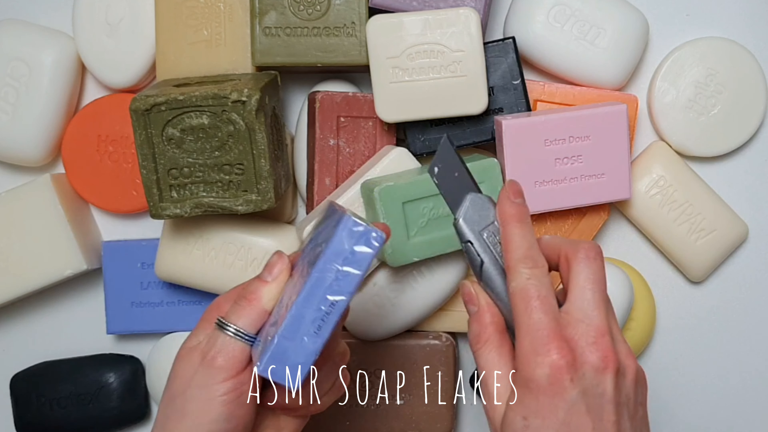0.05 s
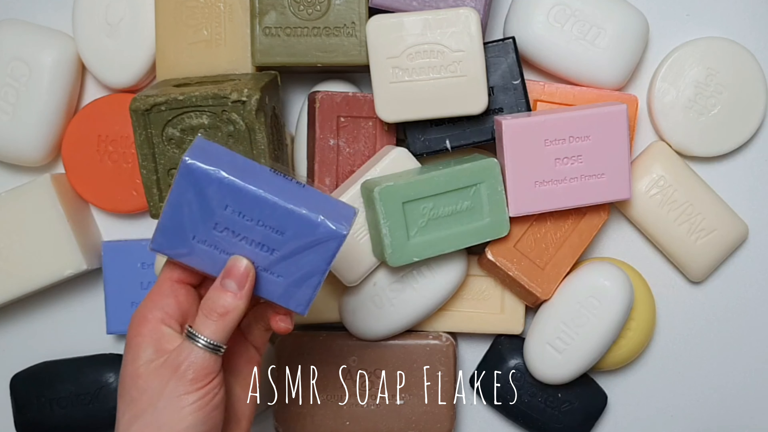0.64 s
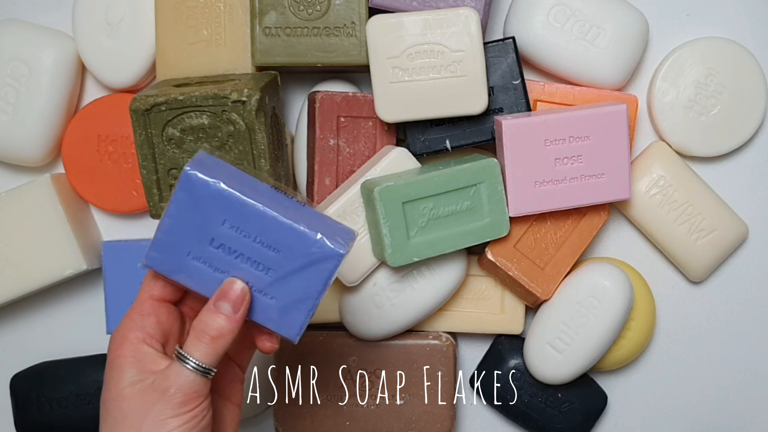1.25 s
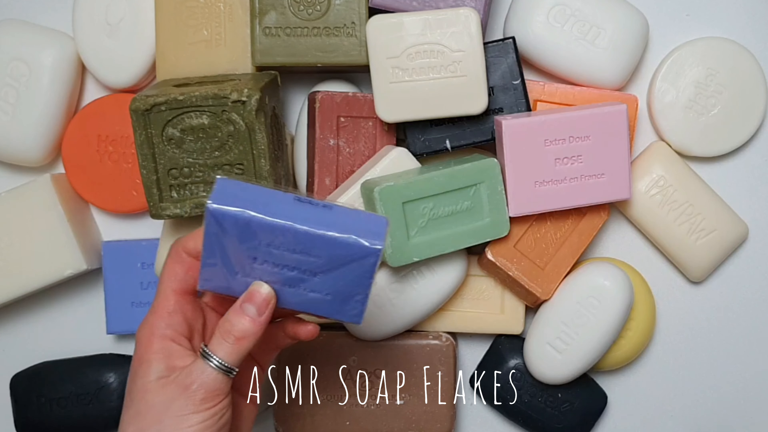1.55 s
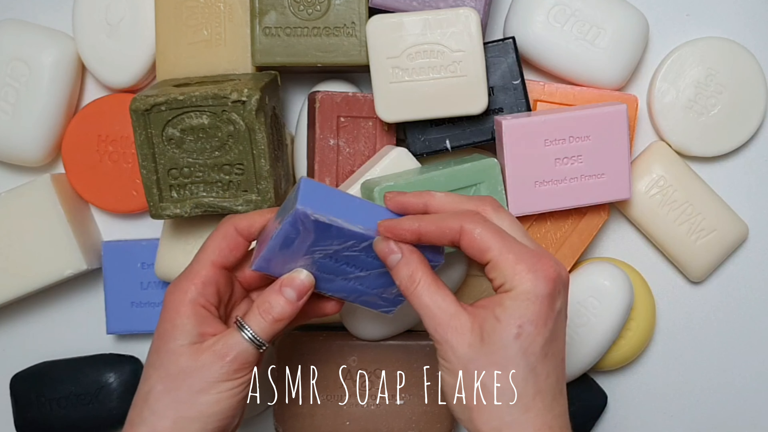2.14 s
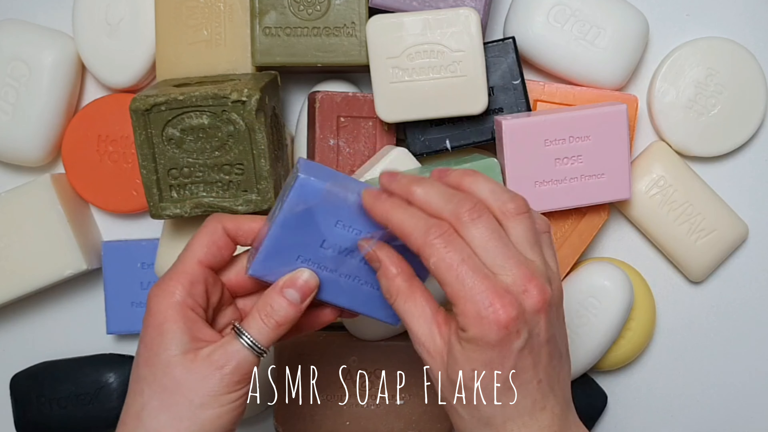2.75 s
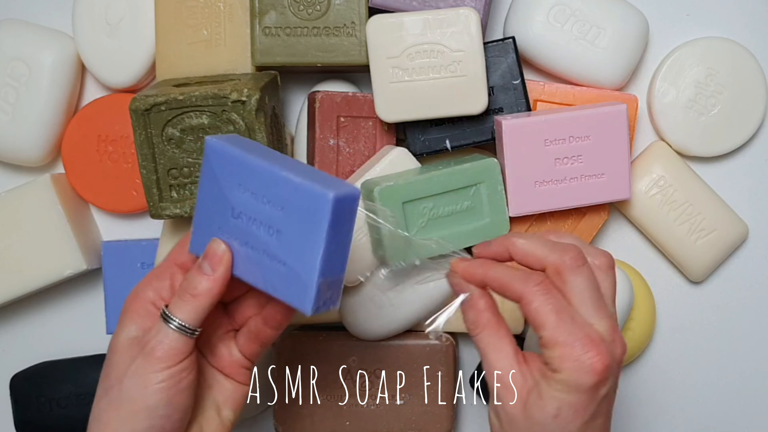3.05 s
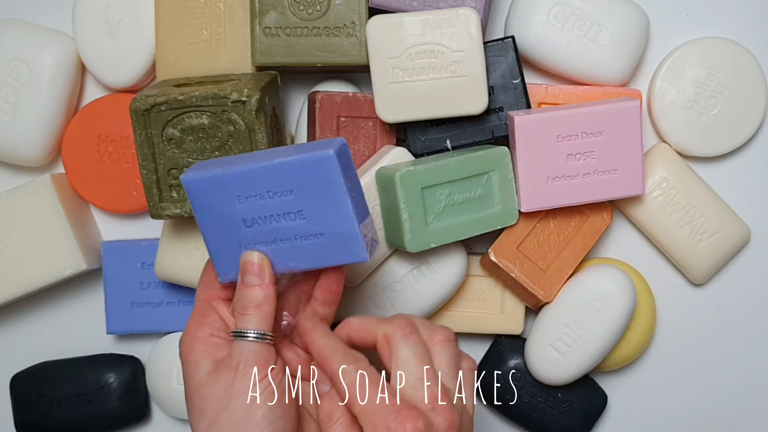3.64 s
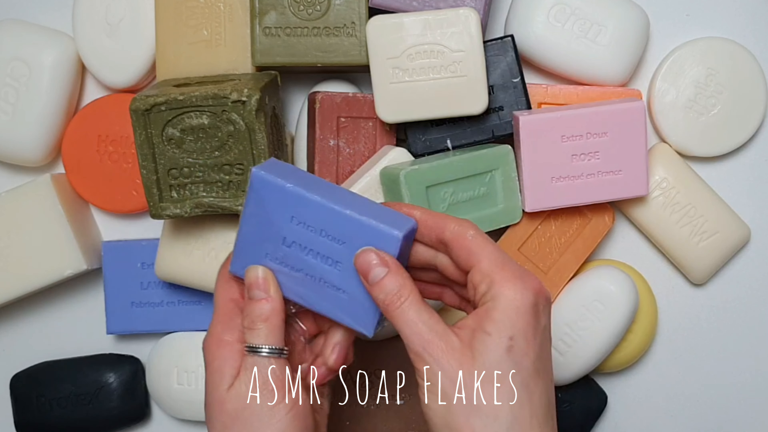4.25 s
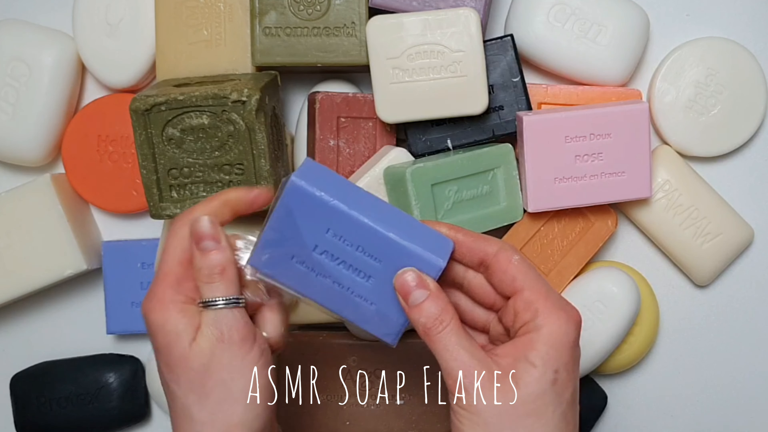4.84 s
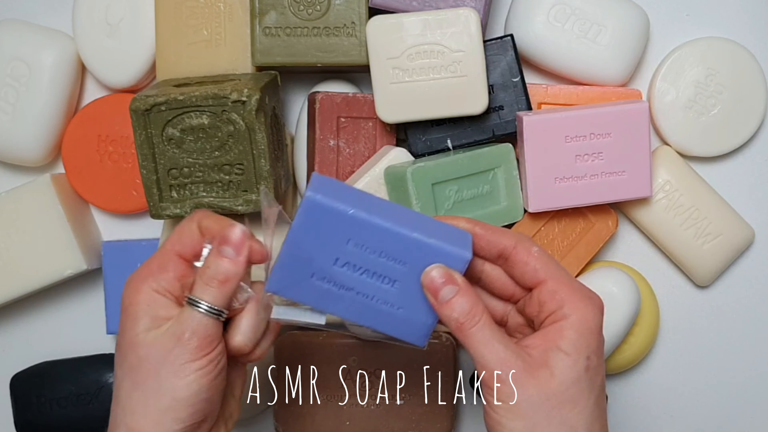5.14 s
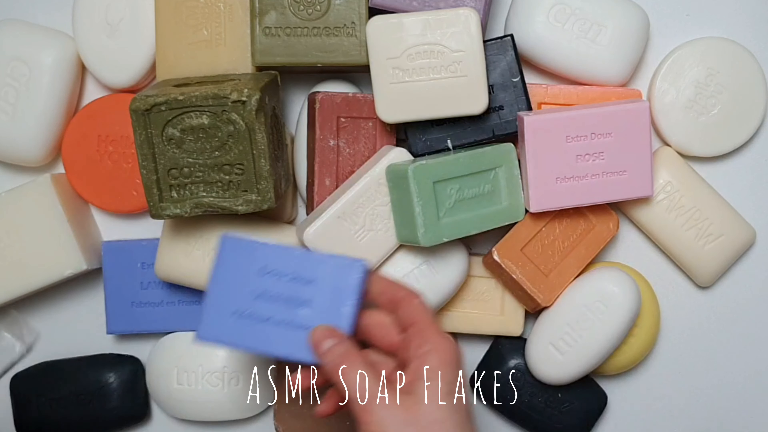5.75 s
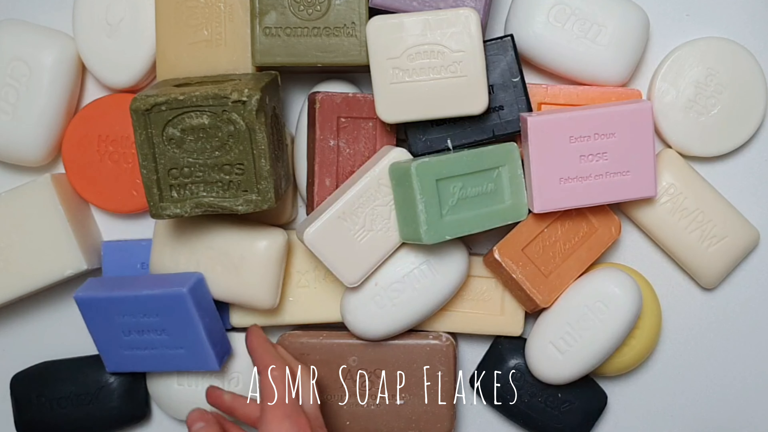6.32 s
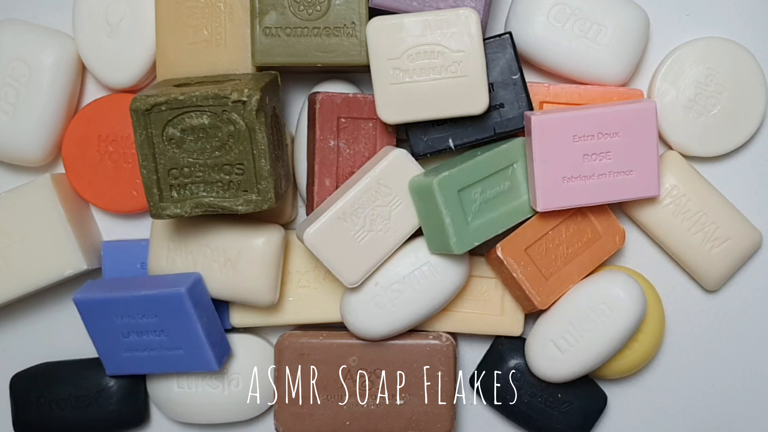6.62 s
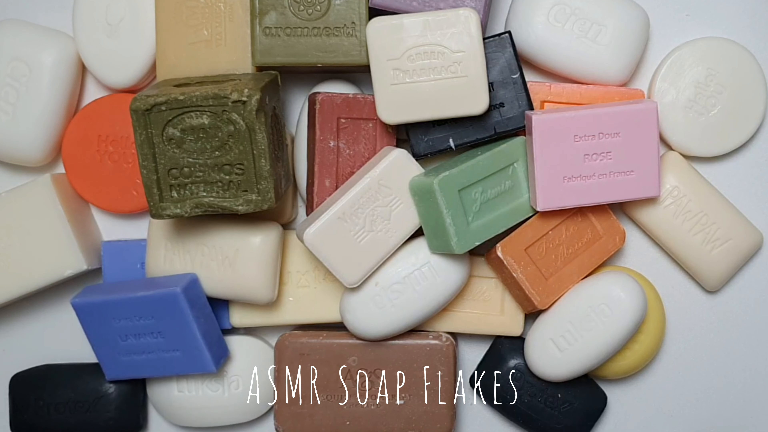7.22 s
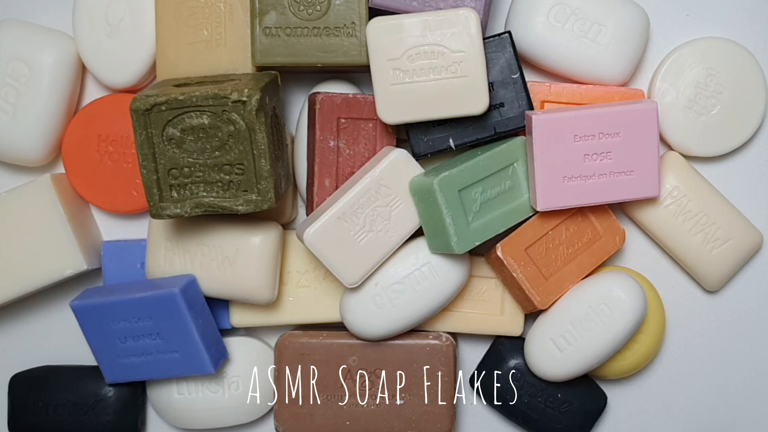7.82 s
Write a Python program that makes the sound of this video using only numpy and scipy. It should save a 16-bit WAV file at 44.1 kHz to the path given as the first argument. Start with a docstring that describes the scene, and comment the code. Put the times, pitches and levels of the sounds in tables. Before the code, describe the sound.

Close crackling, popping plastic film is pulled from a bar of soap, followed by dull knocks of soap on soap and fading rustles.

```python
"""Thin plastic wrap is peeled off a bar of soap, close to a pair of microphones in a small, bare room.
Over faint hiss, fingers tug at the film: creases crinkle and snap, taut patches pop like drumheads.
From about 2 s the pulls grow harder and the film gives way in cracks, then rasps as it comes free.
Near 6 s it goes on rustling at the side while the bar is set down on a pile of soaps, which knock
together as they settle. A soft, low shuffle follows."""
import sys
import numpy as np
from scipy import signal
from scipy.fft import rfft, irfft
from scipy.io import wavfile

SR = 44100
rng = np.random.default_rng(int(sys.argv[2]) if len(sys.argv) > 2 else 0)


def bounce(signal):
    """Save signal as a 16-bit WAV file at the path given by the first command-line argument."""
    frames = np.transpose(np.atleast_2d(signal))
    limited = np.clip(frames, -1, 1)
    pcm = np.round(limited * 32767).astype(np.int16)
    wavfile.write(sys.argv[1], SR, pcm)


N = 347508
TIME = np.arange(N) / SR


def from_db(db):
    """Decibels to gain."""
    return 10 ** (np.asarray(db) / 20)


def rms_one(x):
    """Scale to rms 1."""
    return x / np.sqrt(np.mean(x ** 2) + 1e-20)


def peak_one(x):
    """Scale to peak 1."""
    return x / np.abs(x).max()


def unit_energy(x):
    """Scale an impulse response so that it keeps the power of noise."""
    return x / np.sqrt(np.sum(x ** 2, axis=-1, keepdims=True) + 1e-20)


def at_hz(points, hz):
    """Read a table on a log-frequency axis."""
    freqs, values = np.transpose(points)
    return np.interp(np.log(np.maximum(hz, 1)), np.log(freqs), values)


def band(x, low_hz, high_hz, order=2):
    """Causal band-pass."""
    edges = [low_hz, min(high_hz, SR / 2 - 10)]
    return signal.sosfilt(signal.butter(order, edges, "band", fs=SR, output="sos"), x)


def eq_pulse(eq, size=4096):
    """The minimum-phase pulse that has this EQ curve; energy 1."""
    gain = from_db(at_hz(eq, np.arange(size // 2 + 1) * SR / size))
    cepstrum = irfft(np.log(gain))
    cepstrum[1:size // 2] *= 2
    cepstrum[size // 2 + 1:] = 0
    return unit_energy(irfft(np.exp(rfft(cepstrum))))


def through(x, pulse):
    """Pass sound through an impulse response."""
    return signal.oaconvolve(np.atleast_2d(x), np.atleast_2d(pulse), axes=-1)[:, :N]


def add(track, s, sound):
    """Mix a one-shot in at s seconds."""
    start = max(round(s * SR), 0)
    track[start:start + len(sound)] += sound[:max(N - start, 0)]


def ringing(modes):
    """One second of decaying sines."""
    t = TIME[:SR]
    return sum(from_db(db - 60 * t / t60) * np.sin(2 * np.pi * hz * t) for hz, db, t60 in modes)


def envelope(rows, attack_s, release_db_per_s):
    """Level in dB of gestures (t/s, hold/s, level/dB) that rise 20 dB per attack_s, hold and die away."""
    level_db = np.full(N, -130.)
    for (s, hold_s, db), rise_s in zip(rows, np.broadcast_to(attack_s, len(rows))):
        attack_db = 20 * np.minimum(TIME - s, 0) / rise_s
        release_db = release_db_per_s * np.maximum(TIME - s - hold_s, 0)
        level_db = np.maximum(level_db, db + attack_db - release_db)
    return level_db


def crackle(per_s, spread_db):
    """Random clicks of uneven size, mostly small; rms 1."""
    sizes = from_db(spread_db * np.minimum(rng.exponential(1, N), 3.5)) * rng.choice([-1, 1], N)
    return rms_one(sizes * (rng.random(N) < per_s / SR) / np.sqrt(per_s))


def flurries(per_s, last_s, bed):
    """One crease sets off its neighbours: a gain of short, sudden bursts over a steady bed; rms 1."""
    starts = (rng.random(N) < per_s / SR) * rng.uniform(.3, 1, N)
    power = signal.lfilter([1], [1, -np.exp(-2 / (last_s * SR))], starts ** 2 + 1e-18)
    return rms_one(np.sqrt(power / power.mean() + bed ** 2))


# reverb time of the bare room: f/Hz, t60/s
ROOM_DECAY = [(100, 0.68), (400, 0.38), (4000, 0.47), (16000, 0.15)]


def room_response(early_db, early_s=0.006, predelay_s=0.0019):
    """Stereo echoes from one spot: early reflections off the table, then a tail that dies by band."""
    t, edges, tail = TIME[:SR // 2], np.geomspace(40, 20000, 13), 0
    for low, high in zip(edges, edges[1:]):
        hz = np.sqrt(low * high)
        alike = 1 / (1 + (hz / 850) ** 2) ** 2   # long waves reach both microphones alike
        mid, side = band(rng.standard_normal((2, len(t))), low, high, order=3)
        pair = np.sqrt(1 + alike) * mid + np.sqrt(1 - alike) * side * [[1], [-1]]
        tail = tail + pair * from_db(-60 * t / at_hz(ROOM_DECAY, hz))
    early_boost = 1 + from_db(early_db) * np.exp(-t / early_s)
    return unit_energy(tail * (t > predelay_s) * early_boost)


def place(x, room, send_db, lag_ms, pan_db):
    """Direct sound, lag_ms later on the right, plus a reverb send; positive pan leans left."""
    x = np.ravel(x)
    direct = np.array([x, np.interp(TIME - lag_ms / 1000, TIME, x)])
    return (direct + from_db(send_db) * through(x, room)) * from_db([[pan_db / 2], [-pan_db / 2]])


def wander(x, rooms, send_db, lag_ms, pan_db, step_s=.02):
    """The sounding spot roams over the film, so its delay and its echoes keep changing."""
    knots = np.arange(0, TIME[-1] + step_s, step_s)
    spot = np.interp(TIME, knots, rng.integers(0, len(rooms), len(knots))).round()
    lags = lag_ms * np.linspace(.8, 1.2, len(rooms))
    return sum(place(x * (spot == k), room, send_db, lags[k], pan_db) for k, room in enumerate(rooms))


# tone of the noise bed: f/Hz, level/dB
BED_EQ = [(20, -37.5), (60, 9), (110, 3.5), (300, -10), (600, -21.5), (3000, -25), (5100, -4.5),
          (7500, -37.5), (12200, -24.5), (16000, -41)]


def noise_bed(gain_db=-70):
    """Microphone hiss, separate in each channel, over a faint rumble that is partly common to both."""
    noise = through(rng.standard_normal((3, N)), eq_pulse(BED_EQ))
    hiss = from_db(4.5) * band(noise[:2], 270, 20000)
    rumble = from_db(-12.0) * band(noise[2] + 1.6 * noise[:2], 39, 280)
    return from_db(gain_db) * (hiss + rumble)


def patter(low_hz, high_hz, cycles, count):
    """Small patches of film pop at random, each at its own pitch; rms 1."""
    out, t = np.zeros(N), TIME[:SR // 20]
    for when, pitch, softness in rng.random((count, 3)):
        hz = low_hz * (high_hz / low_hz) ** pitch
        decay = from_db(-14 * softness - 60 * t * hz / cycles)
        add(out, when * TIME[-1], decay * np.sin(2 * np.pi * hz * t))
    return rms_one(band(out, low_hz / 2, high_hz * 2, order=3))


# tone of one film click as coloured by the microphones: f/Hz, level/dB
CLICK_EQ = [(45, -70), (90, -13), (170, -23), (320, -8), (460, -6.5), (630, -6.5), (920, -3), (1250, -2),
            (2000, 3), (4000, 8.5), (4900, 4.5), (5800, -5.5), (7500, -33.5), (10500, -25), (16000, -21.5)]
# fingers tug at the film, then draw the bar out in long pulls; fine creases set the level,
# the sharpest add air, the whole sheet adds body: t/s, hold/s, level/dB, air offset/dB, body offset/dB
TUG_CUES = [(0.0, 0.0043, -57, -6, -11.5), (0.205, 0.093, -59, 3.5, -20), (0.35, 0.1, -63, 3, -18),
            (0.49, 0.15, -74.5, -2, -16), (1.23, 0.14, -71.5, -3.5, -19), (1.41, 0.088, -67, 1, -19),
            (1.505, 0.035, -58, 2.5, -11), (1.66, 0.13, -66, -3, -8), (1.932, 0.15, -56, -3.5, -16),
            (2.06, 0.0051, -40, -3, -17.5), (2.206, 0.029, -34.5, -5.5, -15.5),
            (2.302, 0.014, -37, -5, -10.5), (2.716, 0.06, -52.5, -4.5, -14.5),
            (2.792, 0.17, -41.5, -10.5, -16), (2.985, 0.0095, -28, -4, -9.5), (3.049, 0.011, -32, -4, -6.5),
            (3.189, 0.0022, -33.5, -7.5, -8.5), (3.297, 0.1, -36.5, -10, -17),
            (3.388, 0.0067, -28.5, -11, -15.5), (3.47, 0.061, -37, -8, -28), (3.564, 0.14, -50, -6.5, -24),
            (3.726, 0.012, -40, -14, -18), (3.877, 0.033, -50, -3, -23), (4.176, 0.098, -44.5, -12.5, -28),
            (4.26, 0.3, -40, -11, -22.5), (4.528, 0.14, -36.5, -7, -15), (4.751, 0.17, -39, -8.5, -14.5),
            (4.965, 0.1, -35, -9, -13.5), (5.176, 0.17, -34.5, -7.5, -5), (5.36, 0.56, -39.5, -9.5, -16)]


def peeling(rooms, firm_tug_db=-35, release_db_per_s=204.5, slack_db_per_s=311):
    """The harder the film is tugged, the more creases buckle; each sounds partly in all sizes of fold."""
    s, hold_s, db, air_offset, body_offset = np.transpose(TUG_CUES)
    attack_s = 0.063 * from_db(0.23 * (db - firm_tug_db))   # harder tugs swell more slowly
    fine_db = envelope(list(zip(s, hold_s, db)), attack_s, release_db_per_s)
    air_db = envelope(list(zip(s, hold_s, db + air_offset)), attack_s, release_db_per_s)
    body_db = envelope(list(zip(s, hold_s, db + body_offset)), attack_s, slack_db_per_s)
    force_db = np.clip(fine_db, -75, -25) - firm_tug_db
    creases_per_s = 1250 * from_db(0.37 * force_db)
    uneven = np.clip(.8 - .06 * force_db, 0, 1)   # under a hard pull the flurries run together
    bursts = flurries(per_s=120, last_s=.0045, bed=.5) ** uneven
    shared = crackle(creases_per_s, spread_db=4.0) * bursts
    pulse, out = eq_pulse(CLICK_EQ), 0
    folds = [(air_db, band(pulse, 7590, 15300, order=4)),
             (fine_db, band(pulse, 4340, 6200, order=3)),
             (fine_db + 0.22 * force_db, band(pulse, 1300, 4050, order=3)),   # force buckles wider folds
             (body_db, band(pulse, 110, 1160, order=3))]
    for fold_db, tick in folds:
        own = crackle(creases_per_s, spread_db=4.0) * flurries(per_s=95, last_s=.005, bed=.4)
        clicks = rms_one(shared + 0.32 * own)
        out = out + through(clicks * from_db(fold_db), unit_energy(tick))
    out = out + patter(450, 1145, cycles=81.0, count=380) * from_db(body_db - 10.0)
    out = out + patter(2000, 5600, cycles=22, count=800) * from_db(fine_db - 2)
    return wander(out, rooms, send_db=-3.0, lag_ms=.16, pan_db=0.0)


CLOSE_SEND_DB = -6.0   # snaps, pops and cracks face the microphones and come drier
# bright tone of a snap: f/Hz, level/dB
SNAP_EQ = [(100, -34.5), (500, -23.5), (1500, -4.5), (3000, 15.5), (6000, 9), (7500, -4.5), (10500, -22),
           (16000, -29)]
# single creases snap through, levels ahead of the drive: t/s, level/dB, edge level/dB
SNAP_CUES = [(0.1995, -44.5, -58), (0.2145, -41.5, -54), (0.2624, -34.5, -43), (0.6464, -52, -72),
             (1.2575, -56, -79), (1.4002, -39.5, -54), (1.4331, -46, -66), (1.4717, -44, -48),
             (1.502, -40, -49), (1.6558, -49, -50), (1.756, -48, -57), (1.8656, -44, -53),
             (2.453, -38, -40), (2.527, -46, -42.5), (2.7045, -40, -55), (2.877, -30, -41.5),
             (2.9424, -23, -29.5), (2.9747, -18, -38.5), (3.0187, -12.5, -40), (3.041, -12, -29),
             (3.1792, -17, -35), (3.4862, -7.5, -41), (3.9008, -27.5, -44), (4.2513, -20, -37.5),
             (4.393, -22, -52), (4.466, -23.5, -39), (4.5772, -25, -47), (4.6054, -21, -50),
             (4.7503, -23.5, -30), (4.8389, -21, -48), (4.8778, -22.5, -51.5), (4.9636, -23, -51),
             (5.13, -15, -37.5), (5.2125, -21, -51), (5.233, -13, -39), (5.2853, 2, -23),
             (5.5015, -28, -41), (5.552, -24, -50), (5.597, -27, -49), (5.8935, -28, -36),
             (6.0207, -31, -44), (6.1574, -31, -49.5), (6.1838, -36, -39.5), (6.2417, -28, -46),
             (6.31, -22.5, -45), (6.4157, -20.5, -40), (6.7384, -23.5, -45), (6.944, -41, -46.5),
             (7.6956, -33.5, -54)]


def snaps(rooms, facet_hz=4990, spread_octaves=0.11, ring_t60=0.0092, ring_db=-17.0, drive_db=8.0):
    """A stiff crease flips at once: a sharp tick, and the facet next to it rings at a pitch of its own."""
    spots, tick = np.zeros((len(rooms), N)), eq_pulse(SNAP_EQ)
    t = TIME[:len(tick)]
    decay = from_db(-60 * t / ring_t60)
    ceiling = from_db(-4.0)   # soft limit keeps the loudest snaps from clipping
    for k, (s, db, edge_db) in enumerate(SNAP_CUES):
        hz = facet_hz * 2 ** (spread_octaves * rng.standard_normal())
        facet = from_db(ring_db) * decay * np.sin(2 * np.pi * hz * t)
        body = tick + signal.fftconvolve(tick, facet)[:len(tick)]
        edge = band(rng.standard_normal(len(t)) * decay, 8000, 18000, order=3)
        gain = ceiling * np.tanh(from_db(db + drive_db) / ceiling)
        snap = gain * peak_one(body) + from_db(edge_db + drive_db) * peak_one(edge)
        add(spots[k % len(rooms)], s + 0.0007, snap)
    return sum(place(x, room, CLOSE_SEND_DB, lag_ms=0.19, pan_db=2.0) for x, room in zip(spots, rooms))


# taut patches pop like drumheads, the wide ones hollow: t/s, level/dB, f/Hz
POP_CUES = [(0.27, -38, 3300), (2.243, -35, 830), (2.857, -31.5, 1180), (3.018, -20, 897),
            (3.145, -34, 855), (3.36, -31.5, 930), (3.561, -25, 2640), (4.328, -37.5, 956),
            (4.52, -16.5, 2900), (4.587, -35, 870), (4.617, -29.5, 922), (4.676, -41, 470),
            (4.878, -43, 527), (4.962, -32.5, 940), (5.188, -30, 977), (5.8642, -24.5, 3470),
            (6.0529, -17.5, 3170)]


def pops(rooms, cycles=39.0, tick_db=3.0):
    """A taut patch flips with a tick and rings briefly in the two lowest modes of a membrane."""
    out, tick = np.zeros(N), peak_one(eq_pulse(CLICK_EQ))
    for s, db, hz in POP_CUES:
        t60 = cycles / hz
        add(out, s, from_db(db) * ringing([(hz, 0, t60), (1.59 * hz, -10, t60 / 2)]))
        add(out, s, from_db(db + tick_db) * tick)
    return wander(band(out, 330, 16000, order=3), rooms, CLOSE_SEND_DB, lag_ms=.16, pan_db=0)


# film sticks and slips on the soap as the wrap comes off: t/s, hold/s, level/dB
RASP_CUES = [(1.24, 0.065, -78), (5.59, 0.27, -43)]


def rasp(low_hz=2200, high_hz=3000):
    """Film slides over the soap in an even run of tiny slips that keeps one stiff fold ringing."""
    level_db = envelope(RASP_CUES, attack_s=0.044, release_db_per_s=125.5)
    slips = crackle(per_s=2500, spread_db=3.0)
    return from_db(level_db) * rms_one(band(slips, low_hz, high_hz, order=3))


# hard accents as the film gives way: t/s, hold/s, level/dB, air offset/dB, body offset/dB
CRACK_CUES = [(2.3202, 0.005, -20.5, -6, -12), (2.9742, 0.0016, -12, -35, -16),
              (3.0183, 0.001, -19.5, -20, -2), (3.0406, 0.002, -17.5, -6.5, -6),
              (3.1779, 0.0019, -23.5, -14, -8.5), (3.486, 0.001, -17, -15, -39),
              (5.1493, 0.012, -19, -14.5, -20.5), (5.285, 0.004, -13, -11, -12.5)]


def cracks(room):
    """Taut film gives way: a crowd of creases buckles at once and is spent within milliseconds."""
    s, hold_s, db, air_offset, body_offset = np.transpose(CRACK_CUES)
    clicks = crackle(per_s=20000, spread_db=1)
    pulse, out = eq_pulse(CLICK_EQ), 0
    for offset, low_hz, high_hz in [(0, 1500, 6200), (air_offset, 7400, 15000), (body_offset, 200, 1400)]:
        level_db = envelope(list(zip(s, hold_s, db + offset)), attack_s=.002, release_db_per_s=1500)
        tick = unit_energy(band(pulse, low_hz, high_hz, order=3))
        out = out + through(clicks * from_db(level_db), tick)
    return place(out, room, CLOSE_SEND_DB, lag_ms=0.15, pan_db=0.5)


# dark tone of a rub: f/Hz, level/dB
SHUFFLE_EQ = [(25, -27.5), (60, -3.5), (165, 0), (270, -3), (480, 2), (1200, -18.5), (2500, -43.5)]
# dull rubs of hands and bars: t/s, hold/s, level/dB
SHUFFLE_CUES = [(3.03, 0.02, -46.5), (6.55, 0.017, -40.5), (7.03, 0.45, -78.5), (7.45, 0.034, -62.5),
                (7.665, 0.068, -62), (7.8, 0.038, -55.5)]


def shuffle(room):
    """Hands and bars rub in many small, soft slips."""
    level_db = envelope(SHUFFLE_CUES, attack_s=0.067, release_db_per_s=197.0)
    slips = crackle(per_s=870, spread_db=6.5) * from_db(level_db)
    return place(through(slips, eq_pulse(SHUFFLE_EQ)), room, send_db=-6.0, lag_ms=0, pan_db=-3.5)


# tone of the loose rustle at the microphones: f/Hz, level/dB
WRAPPER_EQ = [(100, -25.5), (500, -10), (2300, -6), (4800, -1.5), (5800, -8), (7500, -31), (11000, -18.5),
              (16000, -18)]
# out of line with the microphones the wrapper loses its top: t/s, low-pass mix/0-1
OFF_AXIS_MIX = [(6.85, 0.29), (7.1, 0.84), (7.6, 1), (7.68, 0)]
# the loose wrapper, put aside, unfolds in fits: t/s, hold/s, level/dB
WRAPPER_CUES = [(5.895, 0.01, -38.5), (6.03, 0.12, -38.5), (6.24, 0.18, -43), (6.5, 0.17, -49),
                (6.62, 0.032, -36), (6.73, 0.064, -44.5), (7.01, 0.009, -41.5), (7.1, 0.097, -50.5),
                (7.23, 0.05, -47), (7.441, 0.0073, -49.5), (7.68, 0.05, -49.5)]


def wrapper(dull_hz=4800):
    """The crumpled film relaxes in flurries of fine clicks, duller while it lies off axis."""
    level_db = envelope(WRAPPER_CUES, attack_s=.025, release_db_per_s=105.5)
    clicks = crackle(per_s=1600, spread_db=4.8) * flurries(per_s=120, last_s=.004, bed=.8)
    rustle = through(clicks * from_db(level_db), eq_pulse(WRAPPER_EQ))
    dull = signal.sosfilt(signal.butter(1, dull_hz, fs=SR, output="sos"), rustle)
    mix = np.interp(TIME, *np.transpose(OFF_AXIS_MIX))
    return rustle * (1 - mix) + dull * mix


# ring of the pile and its surroundings: f/Hz, level/dB, t60/s
PILE_MODES = [(518, 10.5, 0.9), (608, 10.5, 0.87), (710, 17, 0.37), (996, -5, 0.59), (1090, -1, .65),
              (1283, -1.5, 0.88)]
# low ring of the table under the pile: f/Hz, level/dB, t60/s
TABLE_MODES = [(60.3, -14, 0.54), (108.6, 0, 0.63), (139, -3.5, .3), (194, -8, 0.25), (258.5, 1.5, 0.2)]
# soap lands on soap: t/s, level/dB, f/Hz, send to the table/dB, grit offset/dB
KNOCK_CUES = [(5.991, -41.5, 608, -46, -21), (6.061, -18.5, 734, -39, -3), (6.07, -6, 714, -27, -17.5),
              (6.082, -15.5, 653, -56.5, -19.5), (6.288, -25, 710, -37, -13.5),
              (6.475, -1.5, 1054, -41.5, -27)]


def knocks(room, band_ratio=1.315, grit_t60=0.057, thud_db=14.0, table_ring_db=-10.5, pile_db=-22.5):
    """Waxy bars meet in a dead knock of a few cycles and graze briefly; pile and table ring on faintly."""
    contacts, pushes, impulse = np.zeros(N), np.zeros(N), signal.unit_impulse(SR // 10)
    grit_decay = from_db(-60 * TIME[:len(impulse)] / grit_t60)
    thud = peak_one(band(impulse, 120, 530))
    for s, db, hz, table_db, grit_db in KNOCK_CUES:
        knock = peak_one(band(impulse, hz / band_ratio, hz * band_ratio, order=3))
        grit = peak_one(band(rng.standard_normal(len(impulse)) * grit_decay, 1600, 2310))
        add(contacts, s, from_db(db) * (knock + from_db(grit_db) * grit))
        add(contacts, s, from_db(table_db + thud_db) * thud)
        add(pushes, s, from_db(table_db + table_ring_db) * impulse)
    pile = from_db(pile_db) * through(contacts, unit_energy(ringing(PILE_MODES)))
    table = through(pushes, ringing(TABLE_MODES))
    return place(contacts, room, send_db=-4.5, lag_ms=0.089, pan_db=-0.5) + pile + table


def scene():
    """The film sounds from several spots near the microphones, the pile from farther down."""
    near = [room_response(early_db=1.5) for spot in range(4)]
    room = room_response(early_db=-18.5)
    crinkle = peeling(near)
    loose_film = wander(wrapper() + rasp(), near, send_db=-3.0, lag_ms=0.423, pan_db=0.8)
    accents = snaps(near) + pops(near) + cracks(room)
    return crinkle + loose_film + accents + knocks(room) + shuffle(room) + noise_bed()


def record(dry, cutoff_hz=16100):
    """Master: clip the peaks at full scale, then cut the top with a steep low-pass."""
    lowpass = signal.ellip(12, .1, 100, cutoff_hz, fs=SR, output="sos")
    return signal.sosfilt(lowpass, np.clip(dry, -1, 1))


dry = scene()
out = record(dry)
bounce(out)
```